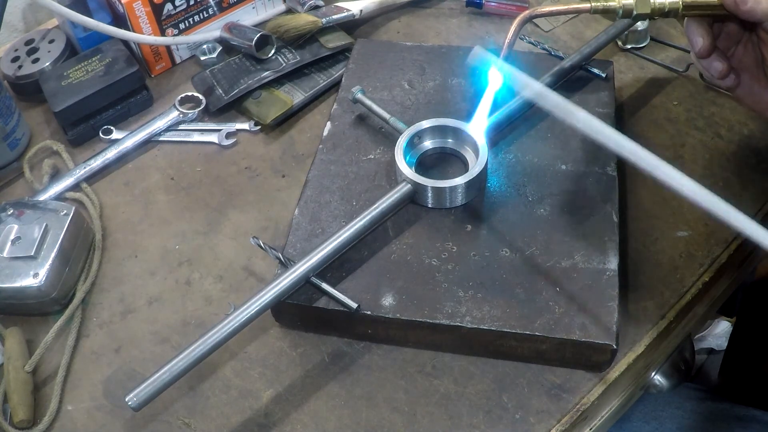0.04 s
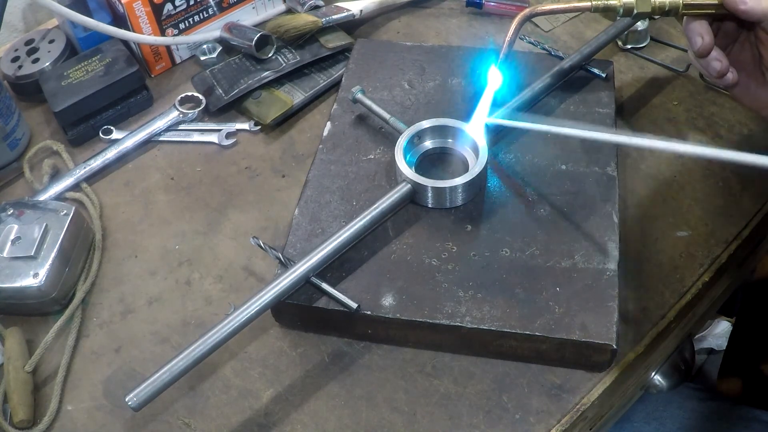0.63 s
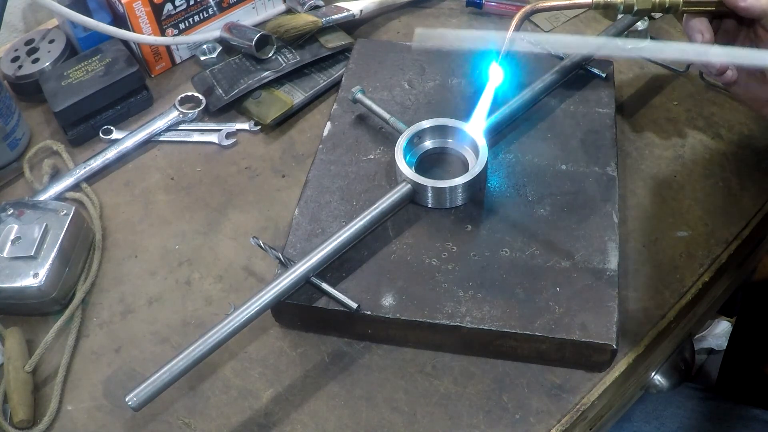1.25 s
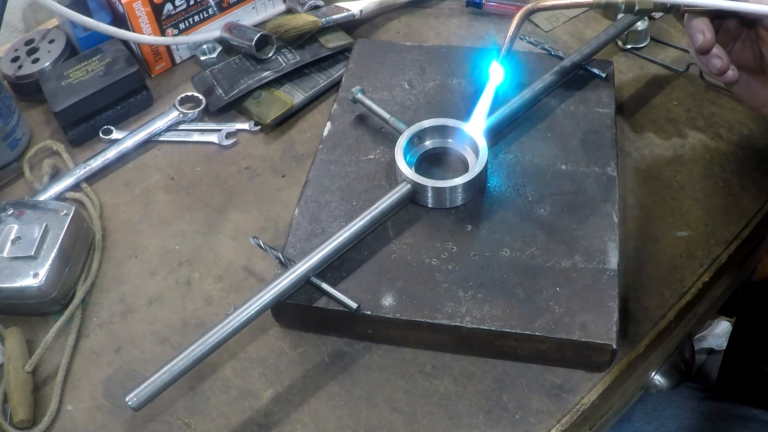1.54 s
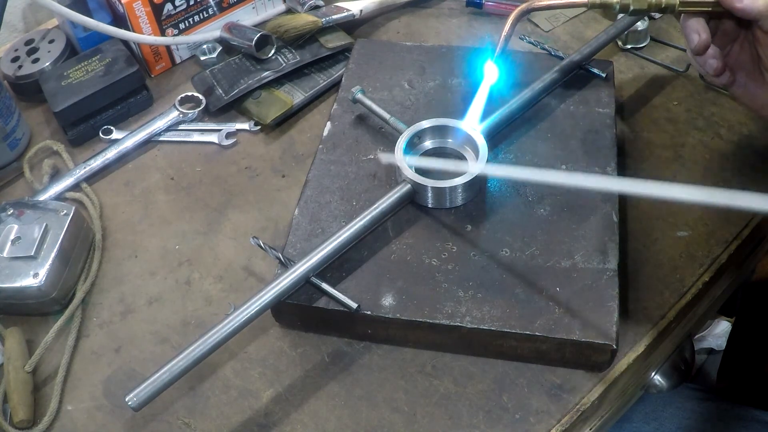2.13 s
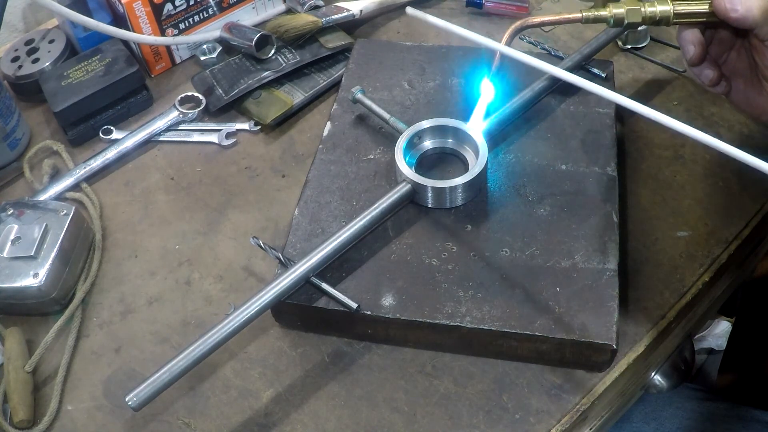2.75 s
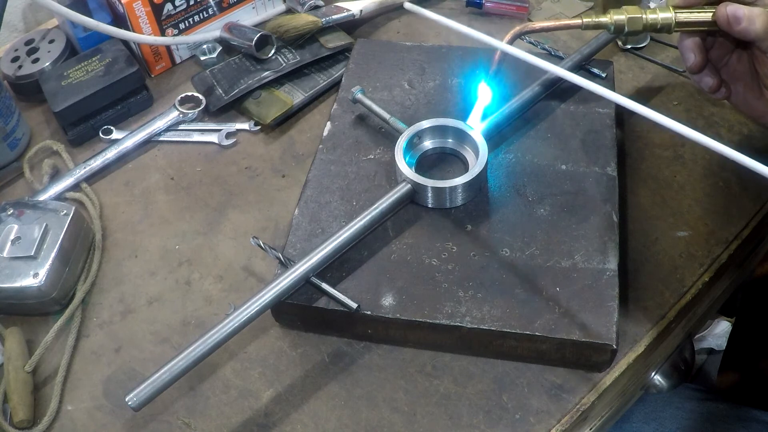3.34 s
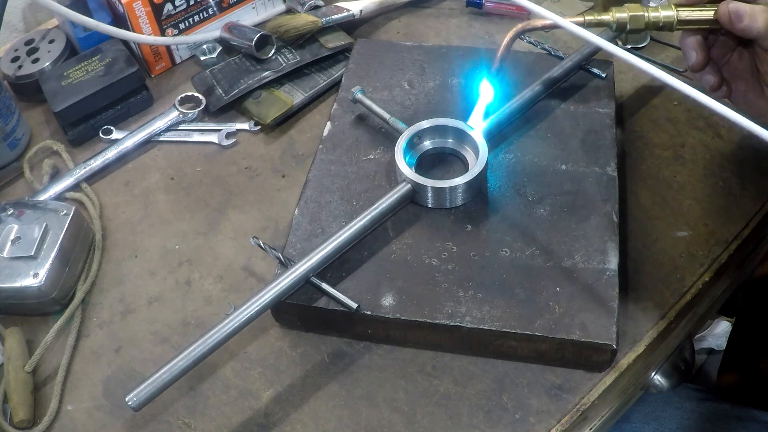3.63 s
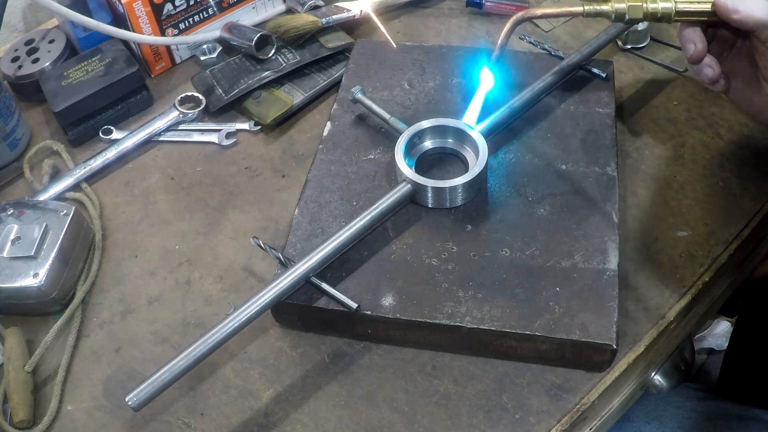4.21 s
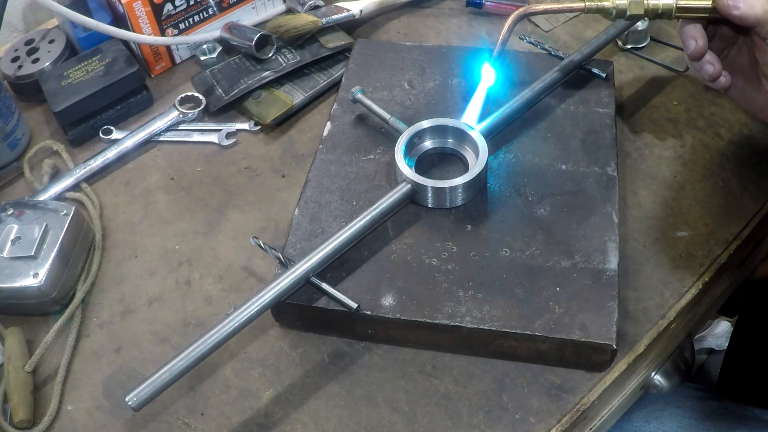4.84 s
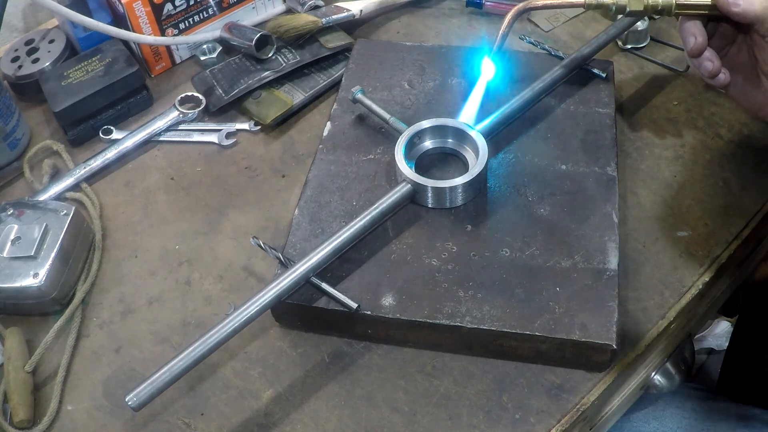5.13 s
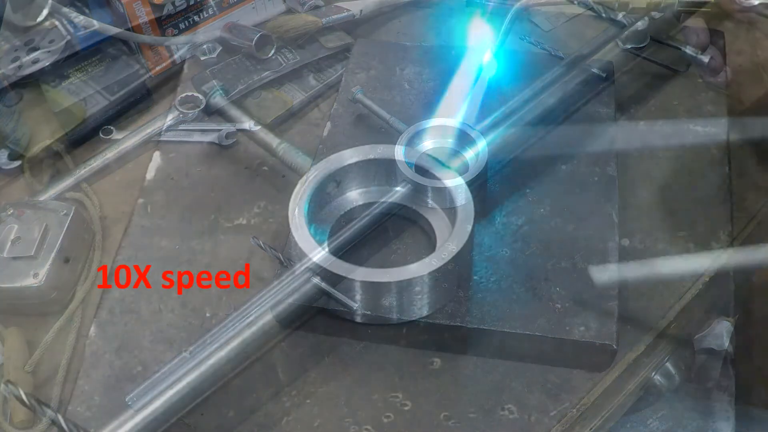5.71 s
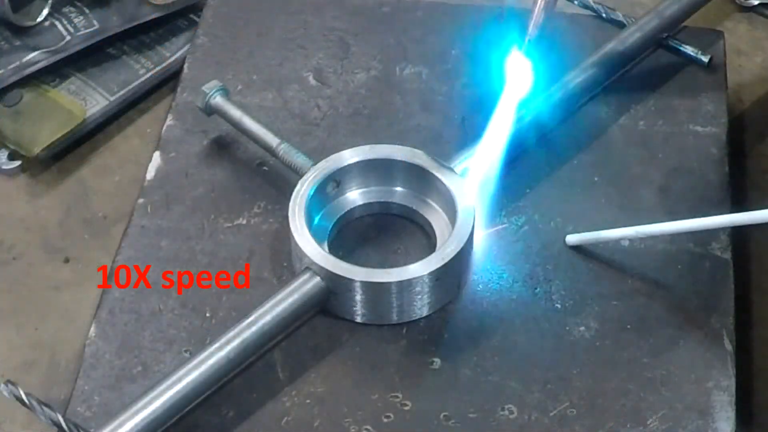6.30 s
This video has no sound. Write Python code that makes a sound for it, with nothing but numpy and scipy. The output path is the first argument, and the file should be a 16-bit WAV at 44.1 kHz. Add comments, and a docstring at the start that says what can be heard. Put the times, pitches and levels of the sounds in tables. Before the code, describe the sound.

Heard up close at a workbench with almost no echo, a gas torch gives a continuous airy hiss with a soft roar and a light sizzle on hot steel. The noise wavers gently, flaring briefly a few times, and a small spark ticks once past the middle. Faint electrical hum sits behind the flame until the sound suddenly stops.

```python
"""Gas torch on a steel joint

A torch burns close by on a workbench, until the sound cuts off. Turbulence radiates broadband noise:
the flame roars, the jet rushes from the tip, and the gas hisses and sizzles where it strikes the steel.
Resonances and echoes colour the noise, and the mix shifts as the hand aims the flame. Two sparks spit
off the joint; a motor and the mains hum faintly in the workshop."""
import sys
import numpy as np
from scipy import signal
from scipy.fft import rfft, irfft
from scipy.io import wavfile
from scipy.ndimage import uniform_filter1d

SR = 44100
rng = np.random.default_rng(int(sys.argv[2]) if len(sys.argv) > 2 else 0)


def to_wav(sig):
    """Store sig (one row per channel, or 1-D mono) as 16-bit WAV at the path in sys.argv[1].

    Samples outside -1..1 are clipped; the rate is SR.
    """
    pcm = np.clip(np.atleast_2d(sig), -1, 1) * 32767
    pcm = np.round(pcm).astype(np.int16)
    wavfile.write(sys.argv[1], SR, pcm.T)  # frames by channels


N = 280476
TIME = np.arange(N) / SR

# Spectra of the parts of the flame's noise: f/Hz, relative spectral level/dB
RUMBLE_SPECTRUM = [(40, -29), (170, -10.5), (260, -0.5), (350, 2.5), (420, -1.5), (520, -14), (1000, -38.5),
                   (16000, -89)]
ROAR_SPECTRUM = [(40, -33.5), (250, -9.5), (400, -1.5), (480, -4), (800, 0.5), (1100, -2.5), (1400, -3),
                 (1800, -1.5), (2400, -20.5), (4000, -43), (16000, -78.5)]
RUSH_SPECTRUM = [(100, -35.5), (700, -25), (1350, -6), (1550, -2.5), (1680, -1), (1850, -0.5), (2060, -3),
                 (2240, -4.5), (2420, -16), (3000, -16), (5000, -43.5), (16000, -78.5)]
RASP_SPECTRUM = [(100, -52.5), (1800, -10.5), (2250, 0.5), (2480, 5.5), (2800, 1.5), (3100, -3),
                 (3400, -5.5), (3700, -15.5), (5000, -38.5), (16000, -62)]
HISS_SPECTRUM = [(100, -40.5), (2800, -19), (3600, -4.5), (4000, -1), (4700, 1), (5400, 0.4), (5750, -10.5),
                 (6600, -14), (8800, -27.5), (16000, -55)]
BRIGHT_SPECTRUM = [(100, -49), (4800, -12.5), (5600, 3), (6400, 0), (6800, -4), (7600, -8), (8800, -16.5),
                   (11000, -38.5), (16000, -43)]
SIZZLE_SPECTRUM = [(100, -42), (5000, -13), (7500, -1), (8600, 2), (9500, 4), (10400, 0.5), (11200, -1),
                   (12100, -6), (12800, -16.5), (16000, -30.5)]
NOZZLE_SPECTRUM = [(100, -29.5), (7000, -10), (11000, -4.5), (12300, -2.5), (13200, 4.5), (15500, -3)]
# Slow course of each part at its source: t/s, level/dB
RUMBLE_LEVEL = [(0.0, -34.5), (1.65, -34), (2.2, -29.5), (2.75, -32.5), (3.3, -35.5), (4.1, -35),
                (4.7, -29.5), (5.15, -33), (5.45, -29)]  # the flame's low rumble
RUSH_LEVEL = [(0.0, -27.5), (0.3, -28.5), (0.8, -25.5), (1.15, -25), (1.6, -26), (1.9, -24.5), (2.65, -25),
              (3.05, -26.5), (3.5, -26), (3.8, -28), (4.15, -28), (4.5, -25), (4.9, -26.5), (5.3, -26.5),
              (5.6, -27.5)]  # the jet's rush
RASP_LEVEL = [(0.0, -30.5), (0.3, -32.5), (1.1, -27.5), (1.9, -29.5), (2.75, -29.5), (3.05, -32.5),
              (4.35, -34.5), (5.3, -32.5), (5.67, -34.5)]  # the jet's rasp
HISS_LEVEL = [(0.0, -36), (0.95, -37), (1.2, -35.8), (1.95, -36.5), (2.45, -39), (2.7, -39), (3.35, -35),
              (3.75, -37), (4.15, -35.5), (5.3, -34.5), (5.6, -39.5)]  # the jet striking the steel
BRIGHT_LEVEL = [(0.0, -42), (0.7, -41), (1.0, -47), (1.3, -42), (2.1, -45), (2.75, -43.5), (3.15, -40),
                (4.05, -40), (4.42, -45.5), (4.85, -41.5), (5.67, -42.5)]  # the bright edge of that hiss
SIZZLE_LEVEL = [(0.0, -58), (0.7, -52.5), (1.02, -48), (1.4, -45.5), (2.45, -50), (2.63, -55),
                (4.48, -60.5), (4.75, -56.5), (5.4, -53.5)]  # gas on the hot steel
NOZZLE_LEVEL = [(0.0, -61), (2.3, -66.5), (3.25, -64), (4.2, -66.5), (4.8, -60.5), (5.6, -59)]  # the nozzle's thin hiss
# Spread of the flame over the work: t/s, roar gain/dB
FLAME_SPREAD = [(0.0, -1.5), (0.65, 2), (1.05, 0.5), (2.25, 2), (2.7, -1), (3.05, -5), (3.3, -6),
                (3.68, -7.5), (4.1, -4.5), (4.6, 0), (5.1, -0.7), (5.67, -2)]
# Brief swells: t/s, half duration/s, gain/dB
FLAME_SURGES = [(0.7, 0.15, 1), (1.42, 0.085, 0.5), (2.0, .08, 0.5), (2.94, 0.042, 3), (3.5, 0.085, 4.5),
                (3.82, 0.11, 5), (5.13, 0.06, 3.5), (5.38, 0.054, 1)]  # the flame spills over the joint
JET_PUSHES = [(.26, 0.15, 5), (.58, 0.037, 2), (.7, 0.044, 2), (1.18, .05, -0.5), (2.64, 0.062, 0),
              (3.25, .05, 0), (5.12, .07, 0.5), (5.32, 0.055, 1)]  # heard in the rush and rasp

# Resonances of the bench and the things around the flame: f/Hz, width/Hz, gain/dB
BENCH_MODES = [(206, 14, -2.5), (275, 58, 5), (503, 28, 8.5), (589.7, 23.6, 12), (728, 59, 5.5),
               (832, 84, 4.5), (953, 89, 4.5), (1174, 41, 4), (1335, 36, 5.5), (1485, 40, 2), (1970, 77, 0),
               (3190, 70, 2.5), (3410, 41, 5), (3560, 70, 3), (3970, 64, 3), (4370, 80, 3)]
# Cavity resonance of the steel ring, sounded by the jet: t/s, gain/dB
RING_GAIN = [(0.0, 0), (0.5, 4.5), (1.3, -0.5), (1.9, -0.5), (2.6, 1.5), (3.25, 4), (3.7, 2.5), (4.15, 3),
             (4.9, -2.5), (5.35, 0), (5.67, -1)]
# Echo off the steel, set by the torch's aim: t/s, delay/ms, notch gain/dB
STEEL_ECHO = [(0.0, 0.96, -5.5), (0.5, 0.76, -3.5), (0.9, 0.9, -4.5), (1.8, 1.06, -3), (2.3, 0.87, -1),
              (2.8, 0.91, -1.5), (4.0, 0.95, 3), (4.46, 1.03, -2.5), (4.62, 1.104, -5.5),
              (5.67, 1.08, -6.5)]
# Bands shaped by that echo: cycles per delay, half width/Hz, share of the notch gain
ECHO_NOTCHES = [(3.5, 250, 1), (5.5, 250, 0.14), (7.1, 350, 0.56)]
# Reflections from other nearby surfaces: delay/ms, amplitude ratio
NEAR_ECHOES = [(.42, 0.039), (1.55, 0.016), (1.92, -0.011)]
# Passing bands: t/s, half duration/s, f/Hz, glide/(Hz/s), half width/Hz, gain/dB
BAND_LIFTS = [(0.06, .25, 6400, 1, 100, 5.5), (0.12, 0.27, 765, 0.5, 130, 3.5),
              (0.95, 0.65, 3215, -200, 230, 2.5), (1.262, 0.24, 4370, 0, 70, 8),
              (1.5, 0.45, 1250, 0.5, 320, 1.5), (1.75, 0.24, 4280, -0.5, 70, 7),
              (1.9, .35, 5240, -59, 150, 5.5), (2.85, .35, 7450, 0, 380, 6), (2.85, .3, 5200, 0.5, 200, 3),
              (3.82, 0.11, 790, 0, 110, 4), (3.99, 0.12, 4730, 0, 110, 6.5), (4.85, .3, 3930, 0, 70, 4.5),
              (4.9, .3, 5560, 0.5, 130.4, 4.5), (5.202, .4, 1450, 1, 80, 5)]  # a band of the noise swells for a while; narrow ones whistle faintly
HAND_HOLLOWS = [(0.35, 0.3, 1480, -1, 179.9, -2.5), (0.4, .22, 4480, -0.5, 220, -7.5),
                (1.25, .25, 2480, -0.5, 220, -3.5), (2.15, .35, 5850, 200.5, 200, -2.5),
                (2.85, 0.51, 1490, 0.5, 88, -3.5), (3.0, 0.55, 4100, 0.5, 130, -2.5),
                (2.85, .3, 4760, 0.5, 110, -5.5), (3.15, 0.66, 450, -0.5, 140, -3),
                (3.3, 0.036, 870, 0, 500, -3), (3.4, 0.078, 1400, -1, 300, -4),
                (3.67, 0.044, 800, 0, 550, -4), (3.6, .55, 6600, -1, 170, -6.5),
                (4.9, .45, 4900, 0.5, 400, -3), (4.8, 0.98, 2470, -100, 80, -7.5)]  # a band goes hollow as the hands move
# Flares of hiss as the jet catches an edge: t/s, half duration/s, f/Hz, half width/Hz, gain/dB
EDGE_FLARES = [(0.03, 0.06, 11000, 5000, 3.5), (0.218, 0.14, 3400, 699, 1), (1.02, 0.03, 9500, 2500, 4),
               (1.405, 0.034, 7200, 1200, 8), (1.442, 0.035, 3400, 700, 3), (1.64, 0.022, 5800, 1700, 5),
               (3.28, 0.07, 13000, 2500, 6), (3.35, 0.17, 6000, 650, 4.5), (3.55, 0.2, 4600, 400, -1.5),
               (3.986, 0.075, 5700, 2000, 3.5), (4.0, 0.06, 11500, 3500, 3), (4.147, 0.036, 4700, 900, 2.5),
               (4.798, 0.06, 9500, 2000, 3), (5.06, 0.04, 9500, 2000, -2), (5.371, 0.092, 9200, 1400, 2.5)]

# Sparks spitting off the hot joint: t/s, level/dB, f/Hz
JOINT_SPARKS = [(4.335, -26, 8400), (4.3445, -41, 9400)]
# Motor and mains lines: f/Hz, level/dB, waver/dB
HUM_LINES = [(35.3, -65.5, 3.5), (72.3, -53, -7.5), (105, -40.5, 2.5), (120, -40, -0.3),
             (207.3, -48.5, 1.5)]
# Spectra of the workshop's rumble and the sparks' fizz: f/Hz, relative spectral level/dB
WORKSHOP_SPECTRUM = [(15, -27), (28, -15), (40, -9.5), (50, -9), (70, -6.5), (87, 2.5), (98, -2), (110, -1),
                     (135, -2), (155, -8), (250, -6.5), (600, -19.5), (4000, -47)]
FIZZ_SPECTRUM = [(2000, -33), (6000, 14), (9000, 1), (15000, -19)]


def flame(roar_db=-28, sway_db=0.54, sway_hz=14):
    """Turbulent noise: shared eddies modulate every part, and the higher parts break into bursts."""
    surge_db, push_db = swells(FLAME_SURGES), swells(JET_PUSHES)
    flutter, eddies, spits = wander(rate_hz=180), wander(rate_hz=380), wander(rate_hz=1100)
    soft_db = 0.73 * flutter + 0.87 * eddies
    coarse_db = 0.82 * flutter + 1.3 * eddies + 1.1 * spits
    crackly_db = np.minimum(2.0 * flutter + 3.9 * eddies + 3.0 * spits, 12)
    parts = [(follow(RUMBLE_LEVEL)[0] + 0.7 * surge_db, RUMBLE_SPECTRUM, soft_db),
             (roar_db + follow(FLAME_SPREAD)[0] + surge_db, ROAR_SPECTRUM, soft_db),
             (follow(RUSH_LEVEL)[0] + push_db, RUSH_SPECTRUM, soft_db),
             (follow(RASP_LEVEL)[0] + push_db, RASP_SPECTRUM, coarse_db),
             (follow(HISS_LEVEL)[0], HISS_SPECTRUM, coarse_db),
             (follow(BRIGHT_LEVEL)[0], BRIGHT_SPECTRUM, coarse_db),
             (follow(SIZZLE_LEVEL)[0], SIZZLE_SPECTRUM, crackly_db),
             (follow(NOZZLE_LEVEL)[0], NOZZLE_SPECTRUM, crackly_db)]
    sound = np.zeros(N)
    for level_db, spectrum, bursts_db in parts:
        unsteady_hand_db = sway_db * wander(sway_hz)
        bursts = rng.standard_normal(N) * gain_of(bursts_db)
        sound += gain_of(level_db + unsteady_hand_db) * coloured(bursts, spectrum)
    return sound


def resonances(hz, t, sway_db=0.74, ring_hz=1820, ring_width_hz=210):
    """Resonance, as gain in dB: bench modes waver slightly at random; the ring's swells and fades."""
    modes_db = 0
    for centre, width, db in BENCH_MODES:
        waver_db = sway_db * np.interp(t, TIME, wander(rate_hz=3.4))
        modes_db += (db + waver_db) / (1 + (2 * (hz - centre) / width) ** 4)
    ring_db = follow(RING_GAIN, t)[0] / (1 + (2 * (hz - ring_hz) / ring_width_hz) ** 2)
    low_shelf_db = -1.94 / (1 + (hz / 1400) ** 4)
    return modes_db + ring_db + low_shelf_db


def passing_bands(hz, t):
    """Spectral shaping: lifts, hollows and flares are Gaussian peaks and dips, in dB."""
    bands_db = 0
    for s, half_s, centre, glide, width, db in BAND_LIFTS + HAND_HOLLOWS:
        bands_db += db * bell(t - s, half_s) * bell(hz - centre - glide * (t - s), width)
    for s, half_s, centre, width, db in EDGE_FLARES:
        bands_db += db * bell(t - s, half_s) * bell(hz - centre, width)
    return bands_db


def echoes(hz, t, steel_share=0.07, scatter_hz=9000):
    """Interference: direct and reflected sound form a comb filter whose notches move with the aim."""
    delay_ms, notch_db = follow(STEEL_ECHO, t)
    bands_db = sum(share * notch_db * bell(hz - cycles * 1000 / delay_ms, width)
                   for cycles, width, share in ECHO_NOTCHES)
    paths = [*NEAR_ECHOES, (delay_ms, steel_share)]
    reflected = sum(share * np.exp(-2j * np.pi * hz * ms / 1000) for ms, share in paths)
    comb = 1 + bell(hz, scatter_hz) * reflected  # shorter waves scatter instead of echoing
    return comb * gain_of(bands_db)


def bench(sound, ripple_db=2.5):
    """Time-varying filtering: the surroundings colour the flame and add a fine drifting ripple."""
    hz, t, spectra = signal.stft(sound, SR, nperseg=2048, noverlap=1536)
    hz = hz[:, None]
    colour_db = resonances(hz, t) + passing_bands(hz, t)
    ripple = uniform_filter1d(rng.standard_normal(spectra.shape), size=4, axis=0)
    ripple = unit_rms(uniform_filter1d(ripple, size=80, axis=1))
    ripple *= hz ** 2 / (hz ** 2 + 2200 ** 2)  # short waves feel small moves most
    response = echoes(hz, t) * gain_of(colour_db + ripple_db * ripple)
    return signal.istft(spectra * response, SR, nperseg=2048, noverlap=1536)[1][:N]


def sparks(rise_s=0.0003, ring_s=0.0013, fizz_s=0.0097, fizz_db=-8):
    """Damped transients: each spark is a bright decaying sinusoid with a fizzing tail."""
    fizz = gain_of(fizz_db) * coloured(rng.standard_normal(N), FIZZ_SPECTRUM)
    sound = np.zeros(N)
    for s, db, hz in JOINT_SPARKS:
        age = np.maximum(TIME - s, 0)
        onset = 1 - np.exp(-age / rise_s)
        snap = np.sin(2 * np.pi * hz * age) * np.exp(-age / ring_s)
        sound += gain_of(db) * onset * (snap + fizz * np.exp(-age / fizz_s))
    return sound


def walls(sound, wet_db=-19, t60_s=0.13, gap_s=0.004):
    """Reverberation: diffuse reflections add a short, exponentially decaying tail."""
    t = np.arange(SR // 3) / SR
    tail = rng.standard_normal(len(t)) * gain_of(-60 * t / t60_s) * (t > gap_s)
    return sound + gain_of(wet_db) * signal.fftconvolve(sound, tail / np.linalg.norm(tail))[:N]


def hum(rumble_db=-39.5):
    """Periodic vibration: a motor and the mains give wavering spectral lines over a low rumble."""
    lines = np.zeros(N)
    for hz, db, waver_db in HUM_LINES:
        amplitude = np.sqrt(2) * gain_of(db + waver_db * wander(rate_hz=4.8))
        phase = 2 * np.pi * (hz * TIME + rng.random()) + 0.13 * wander(rate_hz=1.3)
        lines += amplitude * np.sin(phase)
    return lines + gain_of(rumble_db) * coloured(rng.standard_normal(N), WORKSHOP_SPECTRUM)


def gain_of(db):
    """Amplitude ratio of a level in decibels."""
    return 10 ** (np.asarray(db) / 20)


def unit_rms(x):
    """Normalisation to rms 1."""
    return x / np.sqrt(np.mean(x ** 2) + 1e-20)


def bell(offset, half_width):
    """Gaussian curve, falling from 1 to 1/e at the half width."""
    return np.exp(-(offset / half_width) ** 2)


def swells(rows):
    """Sum of Gaussian swells in dB, one for each row."""
    return sum(db * bell(TIME - s, half_s) for s, half_s, db in rows)


def follow(rows, t=TIME):
    """Linear interpolation of a table's columns at times t."""
    times, *columns = np.transpose(rows)
    return [np.interp(t, times, column) for column in columns]


def wander(rate_hz):
    """Low-pass noise: random motion of rms 1, mostly slower than the rate."""
    hz = np.fft.rfftfreq(N, 1 / SR)
    return unit_rms(irfft(rfft(rng.standard_normal(N)) / (1 + (hz / rate_hz) ** 2), N))


def coloured(x, spectrum):
    """Filtering by a spectrum interpolated in log frequency; the result has rms 1."""
    hz = np.fft.rfftfreq(N, 1 / SR)
    points_hz, points_db = np.transpose(spectrum)
    shape_db = np.interp(np.log(hz + 1), np.log(points_hz + 1), points_db)
    return unit_rms(irfft(rfft(x) * gain_of(shape_db), N))


def scene():
    """Superposition: torch and sparks reverberate in the humming workshop, on one channel."""
    torch = bench(flame()) + sparks()
    return (walls(torch) + hum())[None]


def record(dry, stop_s=5.694, cutoff_hz=15550):
    """Gating and band limiting: everything stops within a millisecond; a low-pass trims the treble."""
    gate = np.clip((stop_s - TIME) / 0.001, 0, 1)
    low_pass = signal.firwin(511, cutoff_hz, window=("kaiser", 9), fs=SR)
    return signal.oaconvolve(dry * gate, low_pass[None], "same")


dry = scene()
out = record(dry)
to_wav(out)
```